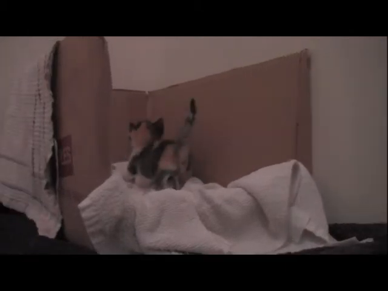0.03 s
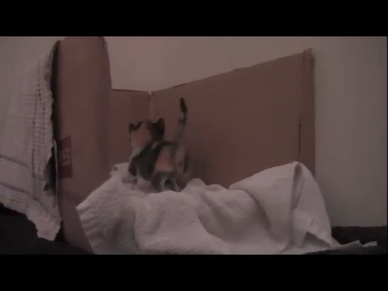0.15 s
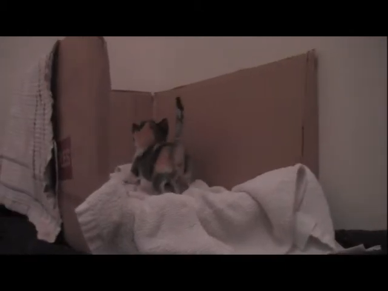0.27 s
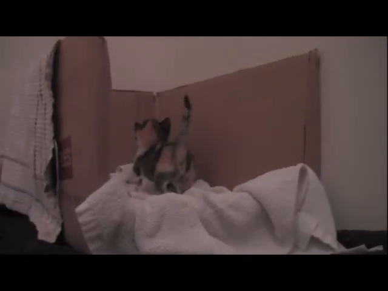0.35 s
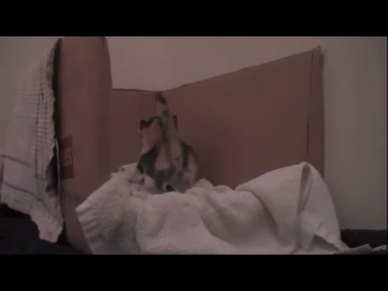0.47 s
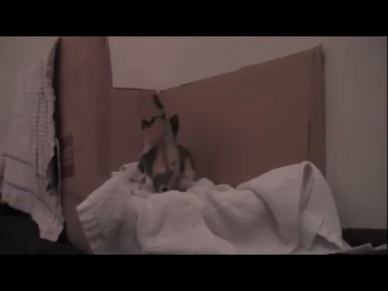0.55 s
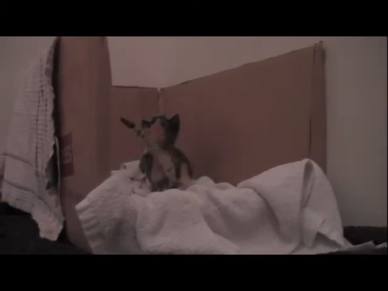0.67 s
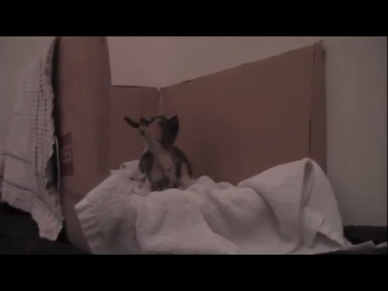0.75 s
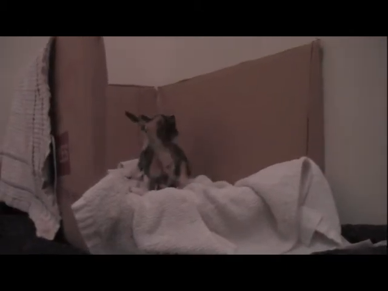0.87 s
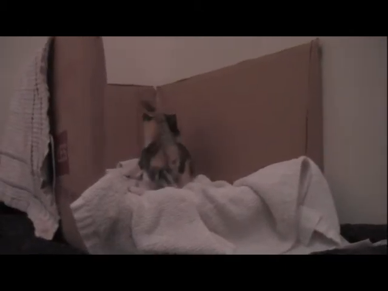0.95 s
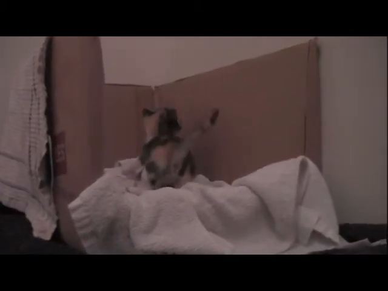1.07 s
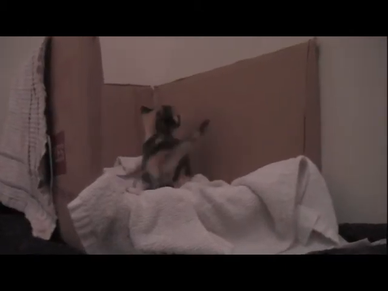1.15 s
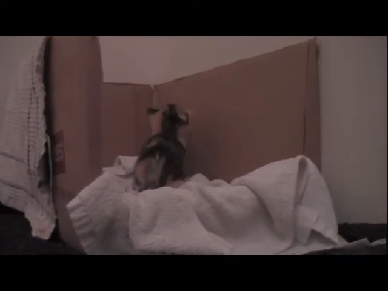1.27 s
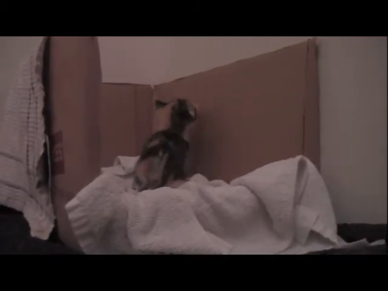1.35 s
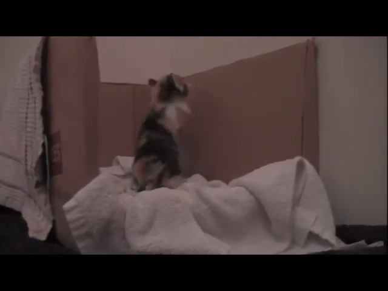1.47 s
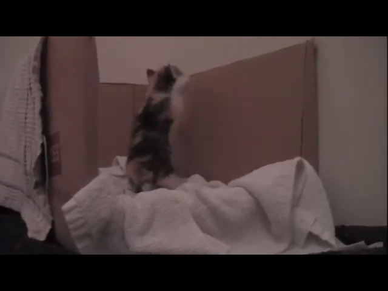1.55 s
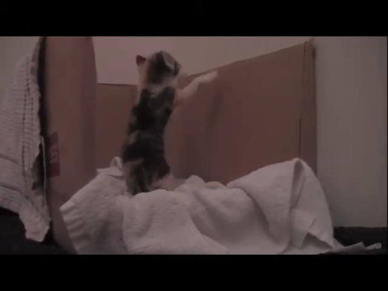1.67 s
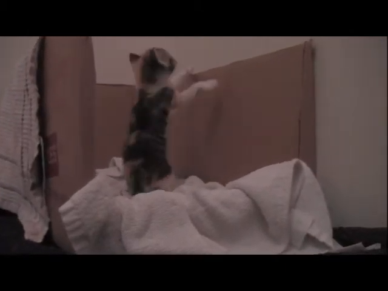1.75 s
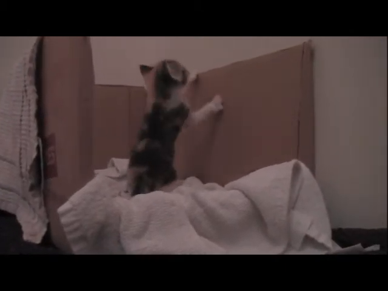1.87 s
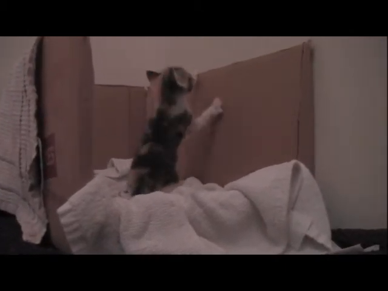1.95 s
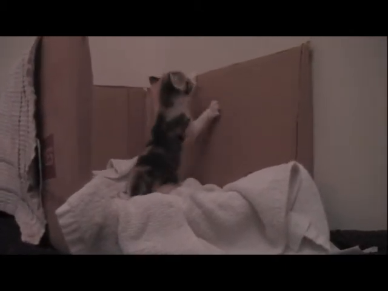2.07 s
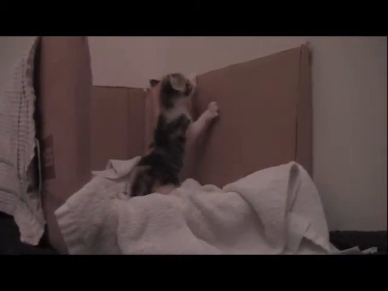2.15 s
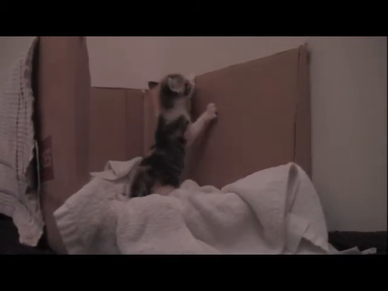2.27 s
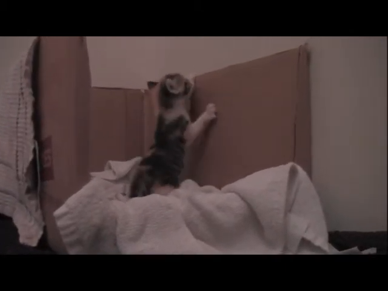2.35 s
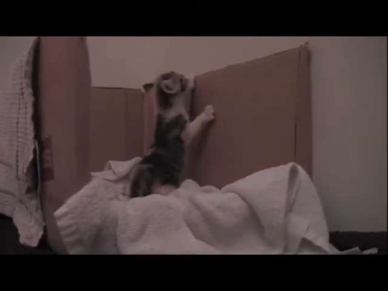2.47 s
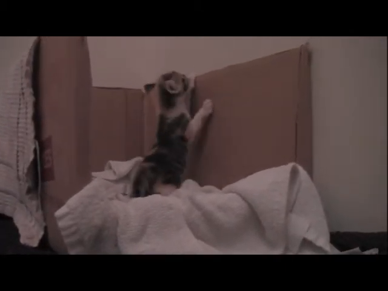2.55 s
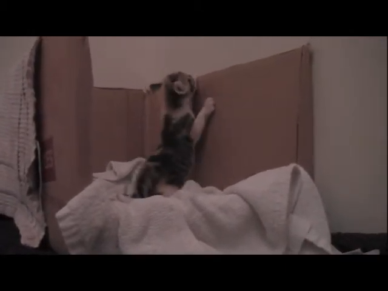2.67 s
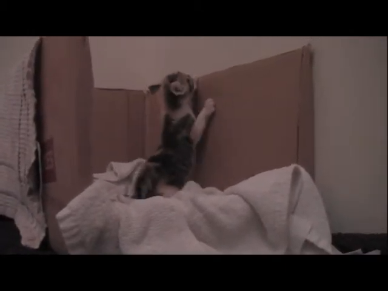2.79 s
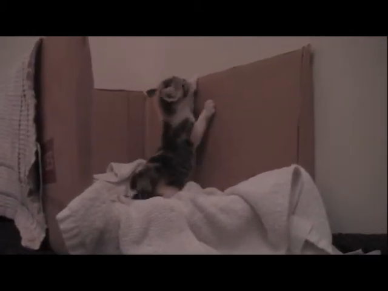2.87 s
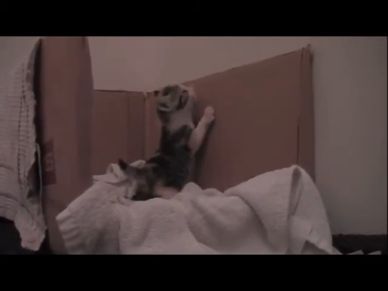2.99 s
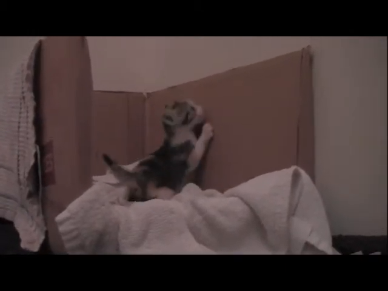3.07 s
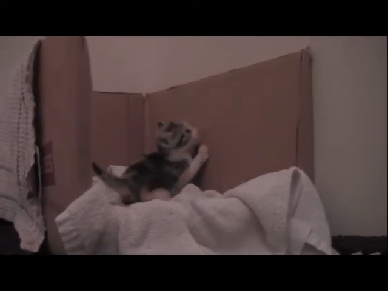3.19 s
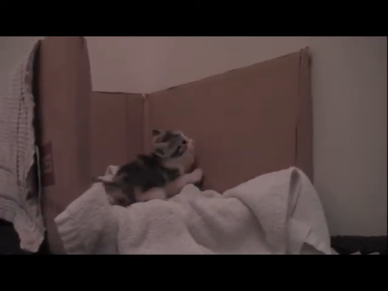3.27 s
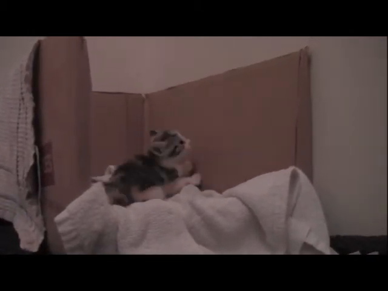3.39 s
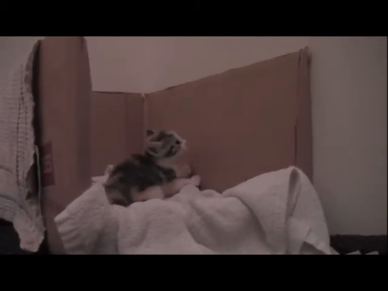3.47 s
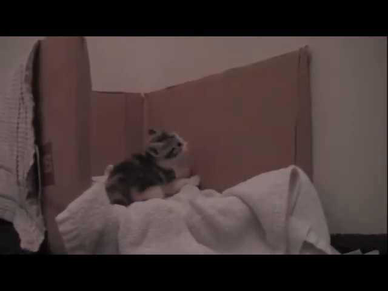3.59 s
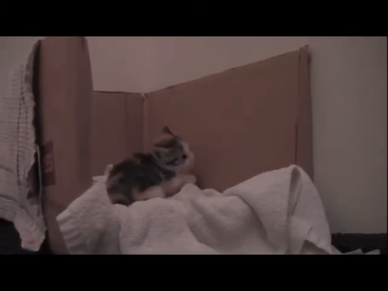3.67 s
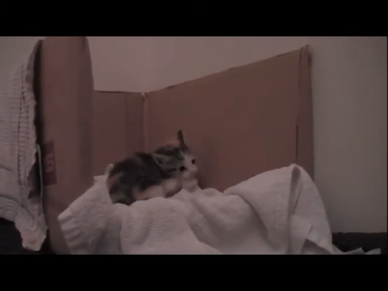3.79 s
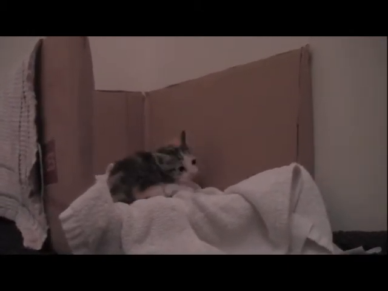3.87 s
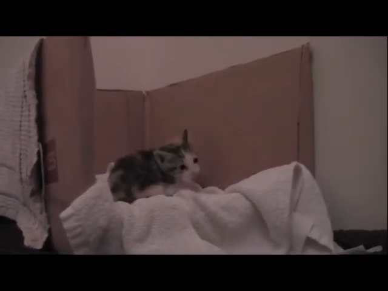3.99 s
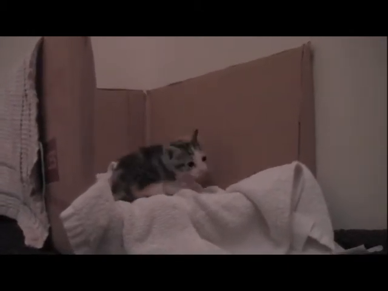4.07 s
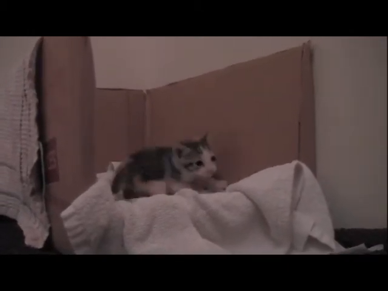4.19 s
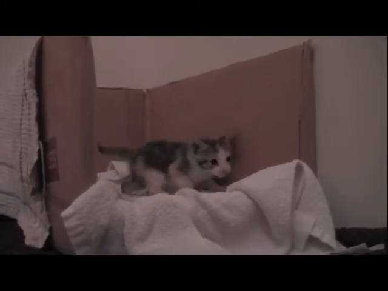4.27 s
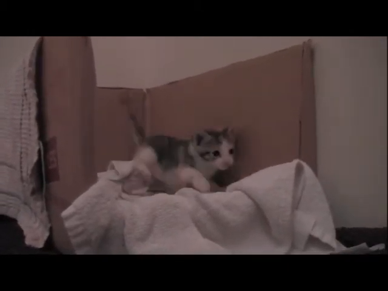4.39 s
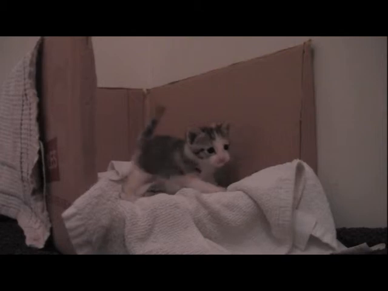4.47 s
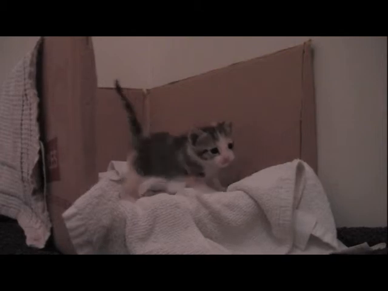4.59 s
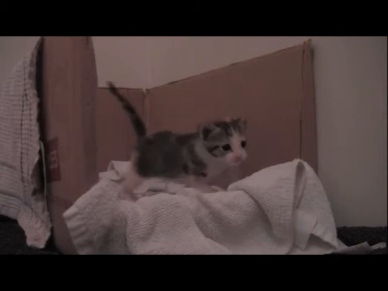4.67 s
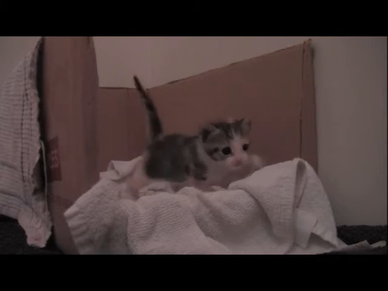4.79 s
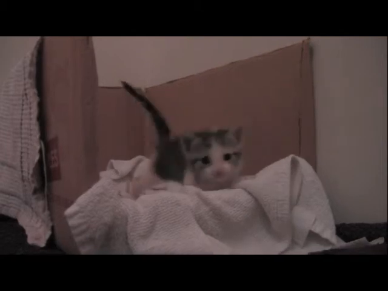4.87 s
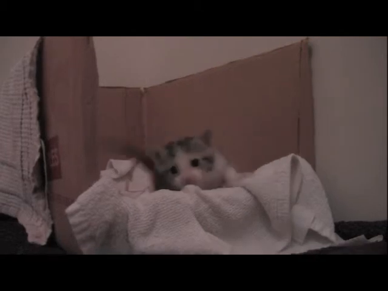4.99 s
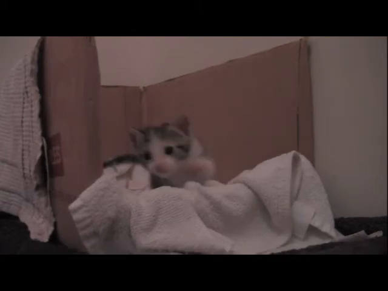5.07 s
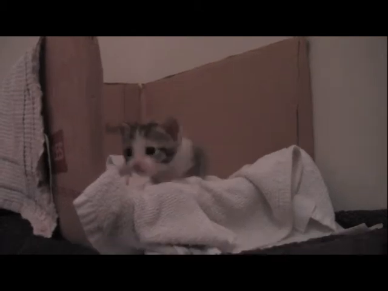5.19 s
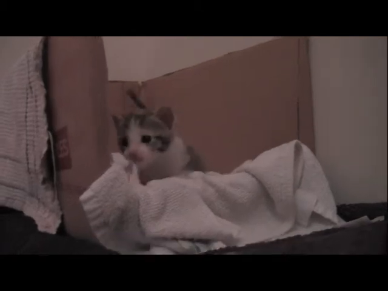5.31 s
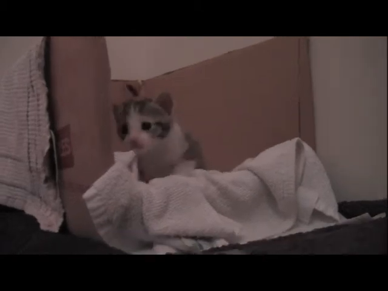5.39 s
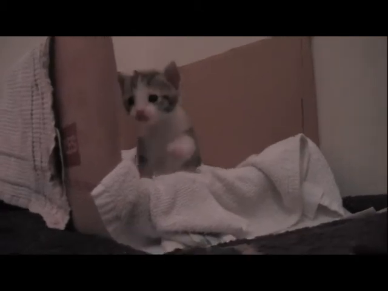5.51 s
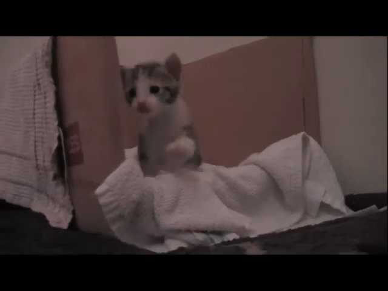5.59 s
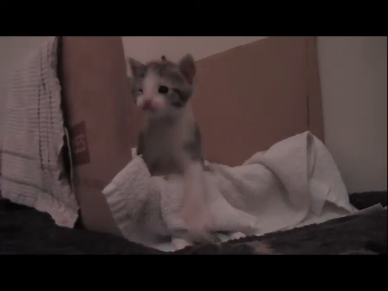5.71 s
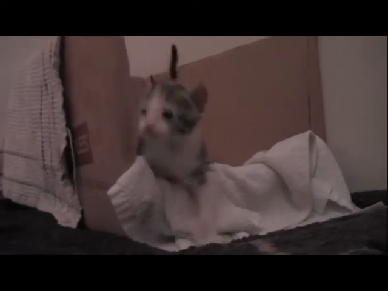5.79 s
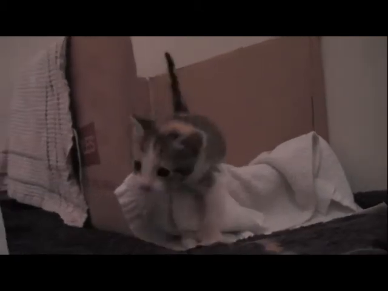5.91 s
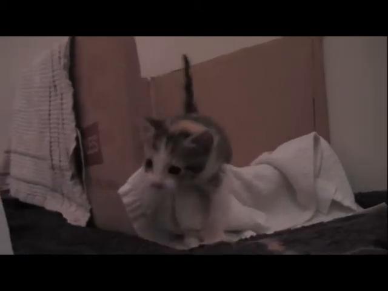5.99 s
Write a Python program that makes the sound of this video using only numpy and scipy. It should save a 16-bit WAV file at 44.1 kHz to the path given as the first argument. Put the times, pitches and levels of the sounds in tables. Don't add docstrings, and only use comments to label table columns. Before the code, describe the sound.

Close indoor sound of a kitten in a cardboard box. Faint steps on a towel lead to a sudden rasping rake with sharp rips, a hollow paw knock and a scratchy grope. Tiny claw ticks follow, then a long scrape down the wall, smaller paddling scrapes and soft padding. Steady stereo hiss, low air and a very faint purr lie underneath, the hiss dipping during the loud scraping.

```python
import sys
import numpy as np
from scipy import signal
from scipy.fft import rfft, irfft, next_fast_len
from scipy.io import wavfile
from scipy.ndimage import uniform_filter1d, map_coordinates

SR = 44100
rng = np.random.default_rng(int(sys.argv[2]) if len(sys.argv) > 2 else 0)


def nominal_scale(level):
    x = np.asarray(level, float) / 20
    return 10 ** x


def put_to_file(sound):
    columns = np.atleast_2d(sound).T
    safe = np.clip(columns, -1, 1)
    whole_steps = np.round(safe * 32767)
    wavfile.write(sys.argv[1], SR, whole_steps.astype(np.int16))


N = 266692

# frequency in Hz, density in dB per Hz.
HISS_MID = [(35, -35), (60, -3), (165, -0.5), (330, -7.5), (569, -9.5), (4510, -20.5), (11900, -30),
            (13000, -50)]
# frequency in Hz, density in dB per Hz.
HISS_SIDE = [(12, -36.5), (20, -2), (59, -14), (330, -5), (700, -8), (1320, -15), (3900, -24), (6000, -80)]
# frequency in Hz, density in dB per Hz.
AIR = [(12, -10), (27, -3), (42, -8.5), (70, -16), (150, -60)]
# frequency in Hz, 60 dB decay time in s.
BOX_DECAY = [(150, 0.48), (600, 0.11), (3000, 0.17), (10000, 0.06)]

# time in s, level in dB.
PURR = [(0.0, -64), (0.27, -57.5), (0.49, -71), (1.6, -60), (2.02, -72), (2.51, -66.5), (2.75, -85),
        (2.96, -72), (3.8, -63.5), (4.6, -70.5), (5.24, -64), (5.71, -77), (5.86, -62), (6.05, -65)]
# frequency in Hz, width in Hz, level in dB.
CHEST = [(102, 180, -7.5), (192, 134, 2.5)]

# frequency in Hz, level in dB.
PANEL_MODES = [(156, 0.5), (215, -4.5), (278, 0.5), (330, -17), (420, -2.5), (511, 0.5), (689, 2.5),
               (985, 6), (1250, 5)]
# start in s, peak in dB, pitch of the struck spot in Hz.
KNOCKS = [(1.451, -36.5, 222), (1.821, -25, 506), (1.915, -39.5, 316), (2.705, -48.5, 231),
          (3.063, -33, 510), (3.08, -34, 291), (3.068, -36.5, 895), (3.091, -32, 556), (3.105, -48, 276),
          (3.194, -41, 523), (4.049, -49.5, 567), (4.1, -48, 534), (4.15, -51.5, 516), (4.18, -50.5, 517),
          (2.235, -46, 1050)]
# start in s, peak in dB, pitch of the struck spot in Hz.
STEPS = [(.178, -44.5, 211), (.187, -39, 463), (.671, -47.5, 463), (.4, -56, 480), (.793, -49.5, 227),
         (.805, -53, 330), (1.005, -50.5, 410), (1.243, -51.5, 845), (1.245, -58, 434), (.675, -53, 680),
         (4.944, -46.5, 208), (4.995, -53.5, 263), (5.082, -46.5, 420), (5.233, -48, 258),
         (5.239, -40.5, 378), (5.399, -47.5, 420), (5.403, -42, 205), (5.871, -42.5, 710),
         (5.894, -47, 306), (5.924, -47, 202), (5.989, -53, 258), (3.965, -50, 129), (4.47, -54, 333),
         (4.505, -52, 303), (4.98, -51, 105), (5.41, -52, 125), (5.93, -49.5, 112)]
# start in s, peak in dB, pitch of the spot in Hz.
BOOMS = [
    (1.59, -45, 292),
    (1.933, -38.5, 320),
    (3.085, -35.5, 291),
]
# decay time of a 400 Hz spot in s, contact in ms, loss of neighbouring modes in dB per octave.
KNOCK_TOUCH, STEP_TOUCH, BOOM_TOUCH = (0.047, 1.16, 6.5), (0.04, 2.6, 9.1), (0.08, 2, 13)

# start in s, peak in dB, pitch in Hz.
CATCHES = [(.0004, -35.5, 2080), (0.1865, -42, 2110), (1.917, -29, 4170), (3.0135, -36, 3790),
           (3.9185, -36, 4100), (4.0495, -51, 4240), (4.108, -45, 4190), (5.841, -42, 1840),
           (5.874, -43.5, 1770), (5.885, -44.5, 3630), (5.9044, -38, 1970), (5.9123, -35.5, 1920),
           (5.9895, -43, 1700), (5.9891, -46, 3560), (.006, -38.5, 1270)]
# start in s, peak in dB, pitch in Hz.
RIPS = [(1.4335, -53, 8600), (1.4525, -24.5, 4270), (1.489, -21, 4300), (1.8213, -44, 2200),
        (1.8235, -39.5, 8560), (2.1949, -30, 3960), (2.197, -35, 9200), (3.0323, -25.5, 3990),
        (3.064, -26.5, 6540), (3.7027, -37, 4100), (4.2961, -45, 3170)]
# start in s, peak in dB, pitch in Hz.
TICKS = [(2.4074, -41, 3980), (2.4244, -44, 2660), (2.4648, -35, 3900), (2.5456, -40, 4000),
         (2.5631, -38, 4020), (2.5824, -39, 3000), (2.5894, -38, 3200), (2.604, -32, 3900),
         (2.7107, -41, 3970), (2.7387, -37, 4170), (2.7581, -32, 4170), (2.7751, -34, 3990),
         (2.7884, -38, 4970), (2.821, -34, 4970), (2.8244, -34, 4300), (2.8314, -40, 2730),
         (2.8699, -37, 3500), (2.8848, -34, 4070), (2.9173, -40, 4340), (2.9537, -32, 4010),
         (2.9714, -34, 3940)]
CATCH_FIBRE_DB, RIP_FIBRE_DB, TICK_FIBRE_DB = -18, -7, -11

# frequency in Hz, width in Hz, level in dB.
PAPER = [(3144, 1420, -4.5), (3580, 250, 1), (4010, 525, -2.5), (5720, 3900, -9)]
# frequency in Hz, width in Hz, level in dB.
BOARD = [(234, 48, -5.5), (420, 137, -3), (495, 112, -1.5), (763, 230, -5.5)]
# frequency in Hz, width in Hz, level in dB.
PAD = [(1067, 500, -2), (2133, 340, 0), (2710, 90, -6.5), (1830, 470, -5.5)]
# frequency in Hz, width in Hz, level in dB.
FIBRE = [(6300, 1970, 0.5), (9150, 1300, 2), (11160, 2400, -8)]

# touch in s, swell in s, peak in dB, touch below peak in dB,
# fade in s per 20 dB.
RAKES = [
    (1.456, 0.011, -40, 13, 0.0934),
    (1.481, 0.018, -31, 8, 0.0778),
    (1.5, 0.017, -30.5, 2, 0.062),
    (1.575, 0.031, -34.5, 8.5, 0.035),
    (1.62, .015, -38.5, -3, 0.05),
]
# touch in s, swell in s, peak in dB, touch below peak in dB,
# fade in s per 20 dB.
GROPES = [(4.046, .008, -54, 0, 0.068), (4.103, 0.013, -49.5, 0, 0.049), (1.938, 0.04, -30.5, 29, 0.045),
          (1.99, 0.016, -30.5, -2.5, 0.034), (2.04, 0.03, -41.5, 11, 0.04), (2.09, 0.045, -51, 11, 0.14),
          (2.196, 0.0011, -36, -10, 0.006), (2.205, 0.016, -54, -7, 0.05), (2.26, 0.026, -58.5, 11, 0.053),
          (2.37, 0.039, -56.5, 15, 0.064), (2.465, 0.021, -50.5, -1, .052), (2.513, 0.074, -54.5, 8, 0.035),
          (2.604, 0.039, -48.5, -2, .06), (2.707, .001, -50.5, -10, 0.1), (2.757, 0.022, -50, 17, 0.012),
          (2.822, .001, -58.5, 3, .048), (2.87, 0.00066, -54, 0, 0.02), (2.904, 0.051, -51.5, 17, .035)]
# touch in s, swell in s, peak in dB, touch below peak in dB,
# fade in s per 20 dB.
SLIDES = [
    (2.99, 0.049, -39.5, 21, 0.069),
    (3.075, 0.047, -35.5, 7, 0.17),
    (3.17, 0.056, -33, 5, .25),
    (3.242, 0.087, -34, -0.5, 0.21),
    (3.4, 0.0128, -39, 2, 0.079),
]
# touch in s, swell in s, peak in dB, touch below peak in dB,
# fade in s per 20 dB.
PADDLES = [
    (3.48, 0.048, -46.5, 7, 0.13),
    (3.585, 0.043, -46, 6, 0.096),
    (3.702, .028, -46, 1.5, 0.1),
    (3.776, 0.033, -41, 8, .075),
    (3.919, 0.014, -46.5, 1, 0.056),
    (4.296, .001, -59, 4, .064),
    (4.73, 0.014, -67, 5, 0.052),
]
# touch in s, swell in s, peak in dB,
# touch below peak in dB, fade in s per 20 dB.
RUSTLES = [
    (1.821, 0.0012, -58, 0, 0.051),
    (4.328, 0.059, -59, 21, 0.2),
    (4.4, 0.12, -67, -3.5, 0.043),
    (4.93, 0.014, -73.5, 9, 0.24),
    (5.23, .012, -74, -4, 0.1),
    (5.8, .07, -70, 7, .05),
    (5.872, 0.021, -62.5, 5, .037),
    (5.9, 0.014, -63, -4, 0.051),
    (5.988, .001, -68, -4, 0.061),
]
# touch in s, swell in s, peak in dB, touch below peak in dB,
# fade in s per 20 dB.
PATS = [
    (0, .001, -67, 0, 0.022),
    (.186, 0.016, -53, 3, 0.039),
    (1.431, 0.011, -55.5, -1.5, .05),
    (1.914, 0.0019, -43.5, 5, .03),
    (3.064, .004, -49, 2.5, 0.066),
    (3.19, 0.013, -41, 3, 0.044),
]

# share of a -45 dB stroke in dB, change in dB per dB of peak.
RAKE_SHARES = [(-9.5, -0.75), (-3, -0.24), (-8.5, 0.13)]
GROPE_SHARES = [(-13.5, -0.81), (-8, -0.29), (-9.5, -0.22)]
SLIDE_SHARES = [(-12, -1.06), (-6, -0.47), (-8.5, 0.29)]
PADDLE_SHARES = [(-9.5, -0.33), (-5.5, -0.1), (-6.5, -0.28)]
RUSTLE_SHARES = [(-5, -0.59), (-3.5, -0.21), (-5.5, -0.19)]
PAT_SHARES = [(-3, -0.25), (2, 0.33), (-15, -0.26)]
SWELL_FOLLOWS = [0.76, 0.72, 0.96]
FADE_FOLLOWS = [0.92, 0.74, 0.94]


def unit(x):
    return x / np.sqrt(np.mean(x ** 2) + 1e-20)


def along(points, hz):
    f, v = np.transpose(points)
    return np.interp(np.log(hz + 1), np.log(f + 1), v)


def wobble(rate):
    knots = rng.standard_normal(int(N * rate / SR) + 4)
    return map_coordinates(knots, [np.arange(N) * rate / SR])


def filtered(x, response):
    m = next_fast_len(len(x) + SR // 4)
    return irfft(rfft(x, m) * response(np.fft.rfftfreq(m, 1 / SR)), m)[:len(x)]


def resonant(modes):
    def response(f):
        return sum((-1) ** k * nominal_scale(db) * 1j * f * width / (hz * hz - f * f + 1j * f * width)
                   for k, (hz, width, db) in enumerate(modes))
    return response


def hiss(spectrum, level_db):
    return nominal_scale(level_db) * unit(filtered(rng.standard_normal(N), lambda f: nominal_scale(along(spectrum, f))))


def slow_air(loud_db):
    puff_db = 9.8 * np.exp(-((np.arange(N) / SR - 4.68) / 0.09) ** 2)
    ducking_db = 0.52 * uniform_filter1d(np.maximum(loud_db + 57, 0), SR // 2)
    return nominal_scale(-68 + 2.5 * wobble(3.3) + puff_db - ducking_db) * hiss(AIR, 0)


def box(x):
    hz, t, z = signal.stft(rng.standard_normal((2, SR // 3)), SR, nperseg=256)
    decay = nominal_scale(-60 * t / along(BOX_DECAY, hz)[:, None])
    tail = signal.istft(z * decay, SR, nperseg=256)[1]
    tail /= np.linalg.norm(tail[0])
    delayed = np.pad(x, (120, 0))
    common, apart = signal.fftconvolve(delayed[None], tail, axes=1)[:, :N]
    apart = nominal_scale(-9) * filtered(apart, lambda f: 0.7 + 1 / (1 + (f / 700) ** 2))
    return np.array([common + apart, common - apart])


def purr():
    times, levels = np.transpose(PURR)
    level_db = np.interp(np.arange(N) / SR, times, levels)
    beats_per_s = 27.9 * (1 + 0.03 * wobble(1.5) + 0.06 * wobble(20))
    beats = np.diff(np.floor(np.cumsum(beats_per_s) / SR), prepend=0)
    sizes = nominal_scale(np.clip(1.7 * rng.standard_normal(N), -5, 3))

    def chest(f):
        return resonant(CHEST)(f) / (1 + 1j * f / 300) ** 2

    return nominal_scale(level_db + 0.5) * unit(filtered(beats * sizes, chest))


def knocks():
    out, t = np.zeros(N + SR), np.arange(SR // 3) / SR
    kinds = (KNOCKS, KNOCK_TOUCH), (STEPS, STEP_TOUCH), (BOOMS, BOOM_TOUCH)
    blows = [(*row, *touch) for rows, touch in kinds for row in rows]
    for s, db, spot_hz, t60, contact_ms, loss_db in blows:
        modes = PANEL_MODES + [(spot_hz, 3)]
        ring = np.zeros(len(t))
        for (hz, mode_db), luck in zip(modes, rng.standard_normal(len(modes))):
            far_db = -loss_db * abs(np.log2(hz / spot_hz))
            decay = nominal_scale(-60 * t / (t60 * (400 / hz) ** 0.73))
            ring += nominal_scale(mode_db + far_db + 2 * luck) * decay * np.sin(2 * np.pi * hz * t)
        ring *= (1 - np.exp(-1000 * t / contact_ms)) ** 2
        out[round(s * SR):][:len(t)] += nominal_scale(db) * ring / np.abs(ring).max()
    return out[:N]


def snags():
    out, t = np.zeros(N + SR), np.arange(SR // 20) / SR
    kinds = (CATCHES, CATCH_FIBRE_DB), (RIPS, RIP_FIBRE_DB), (TICKS, TICK_FIBRE_DB)
    for s, db, hz, fibre_db in [(*row, fibre) for rows, fibre in kinds for row in rows]:
        t60 = 0.009 * nominal_scale(0.6 * max(db + 34, 0))
        force = 0.33 * rng.standard_normal(len(t)) * nominal_scale(-60 * t / t60)
        force[0] = 1
        claw = filtered(force, lambda f: resonant([(hz, hz, 0)])(f) ** 3)
        fibre = filtered(force, lambda f: resonant([(9200, 4500, 0)])(f) ** 2)
        snag = claw / np.abs(claw).max() + nominal_scale(fibre_db - 2) * fibre / np.abs(fibre).max()
        out[round((s + 0.0005) * SR):][:len(t)] += nominal_scale(db - 1) * snag
    return out[:N]


def slips(per_s, spread_db, smooth_db):
    chance = rng.random(N)
    sign = np.sign(rng.standard_normal(N))
    size = np.minimum(rng.exponential(size=N), 2.5)
    jumps = (chance < per_s / SR) * sign * nominal_scale(spread_db * size) / np.sqrt(per_s)
    return unit(unit(jumps) + nominal_scale(smooth_db) * rng.standard_normal(N))


def stroke_levels():
    t, out = np.arange(SR) / SR, np.zeros((4, N))
    touch_s = 0.0022
    dwell = 1.086
    kinds = ((RAKES, RAKE_SHARES), (GROPES, GROPE_SHARES), (SLIDES, SLIDE_SHARES),
             (PADDLES, PADDLE_SHARES), (RUSTLES, RUSTLE_SHARES), (PATS, PAT_SHARES))
    for rows, shares in kinds:
        share_db, change = np.transpose([(0, 0), *shares])
        for s, swell, db, touch_db, fade in rows:
            part = out[:, round(s * SR):][:, :SR]
            u = t[:part.shape[1]]
            swell, fade = max(swell, 0.0005), max(fade, 0.005)
            swell_db = -touch_db * np.maximum(1 - u / swell, 0) ** dwell
            fade_db = -20 * (np.maximum(u - swell, 0) / fade) ** dwell
            peak_db = db + share_db + change * (db + 45)
            level_db = (peak_db[:, None] + np.outer([1, *SWELL_FOLLOWS], swell_db)
                        + np.outer([1, *FADE_FOLLOWS], fade_db))
            part[:] = np.maximum(part, np.minimum(u / touch_s, 1) * nominal_scale(level_db))
    return out


def steep(drive, modes):
    hz = modes[1][0]
    return filtered(drive, lambda f: resonant(modes)(f) * resonant([(hz, 1.5 * hz, 0)])(f))


def scraping():
    strokes = stroke_levels()
    contact = np.clip(strokes[0] / nominal_scale(-32), 0.1, 1) ** 0.4
    grip = nominal_scale(0.21 * wobble(60) + 0.4 * wobble(220))
    force = unit(grip * slips(3000 * contact, spread_db=4, smooth_db=-4))
    shove = unit(0.65 * force + grip * rng.standard_normal(N))
    tearing = unit(0.48 * force + grip * slips(7000 * contact, spread_db=12, smooth_db=-5))
    out = np.zeros(N)
    for drive, stroke, modes in zip((force, shove, force, tearing), strokes, (PAPER, BOARD, PAD, FIBRE)):
        out += steep(drive * stroke, modes) / np.std(steep(drive, modes))
    return out


def scene():
    kitten = scraping() + snags() + knocks()
    return kitten + nominal_scale(-10.5) * box(kitten) + purr()


def joint_stereo(x, masked_db, stray):
    top_hz, stereo_top_hz = 12550, 4000
    hz, _, (mid, side) = signal.stft(np.array([x[0] + x[1], x[0] - x[1]]) / 2, SR, nperseg=2048)
    band = (hz // 172).astype(int)
    power = np.add.reduceat(np.abs([mid, side]) ** 2, np.arange(0, len(hz), 8), axis=1)
    audible = power[0] < nominal_scale(2 * masked_db) * power[1]
    strays = np.repeat(rng.random(power[0].shape) < stray, 3, axis=1)
    keep = audible | strays[:, :power.shape[2]]
    side = side * keep[np.minimum(band, len(keep) - 1)] * (hz < stereo_top_hz)[:, None]
    mid = mid * (hz < top_hz)[:, None]
    mid, side = signal.istft(np.array([mid, side]), SR, nperseg=2048)[1][:, :N]
    return np.array([mid + side, mid - side])


def low_pass(x):
    return signal.sosfilt(signal.butter(12, 13350, fs=SR, output="sos"), x)


def record(dry):
    loud_db = 10 * np.log10(np.abs(uniform_filter1d(dry.mean(0) ** 2, SR // 6)) + 1e-12)
    over_db = uniform_filter1d(np.maximum(loud_db + 43, 0), SR // 5)
    mid, side = hiss(HISS_MID, -62), hiss(HISS_SIDE, -61.5)
    air = slow_air(loud_db)
    capsules = nominal_scale(-0.3 * over_db) * np.array([mid + air + side, mid + 0.8 * air - side])
    mix = joint_stereo(dry + capsules, masked_db=10.5, stray=0.084)
    return low_pass(mix)


dry = scene()
out = record(dry)
put_to_file(out)
```